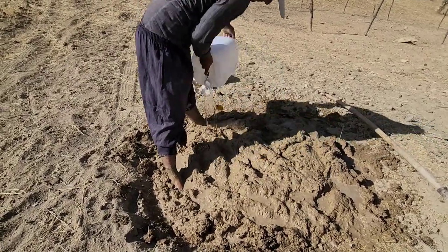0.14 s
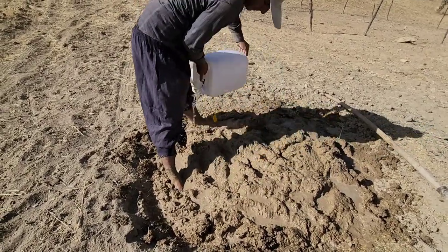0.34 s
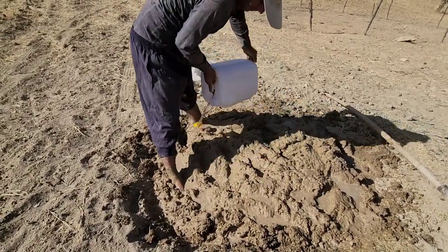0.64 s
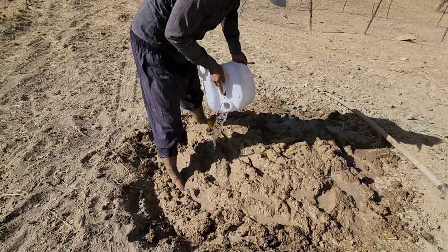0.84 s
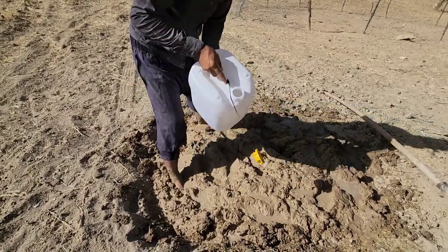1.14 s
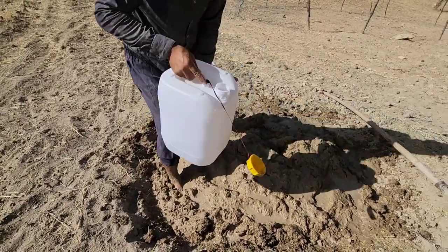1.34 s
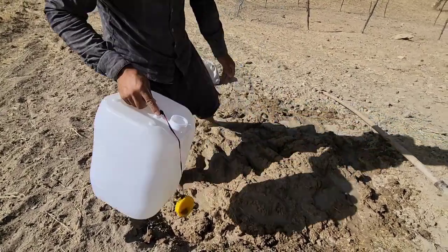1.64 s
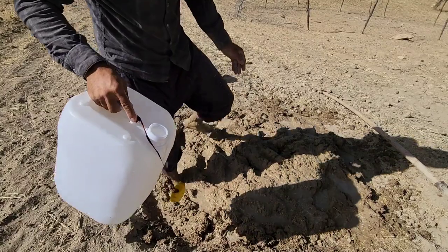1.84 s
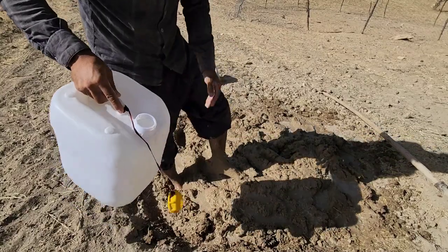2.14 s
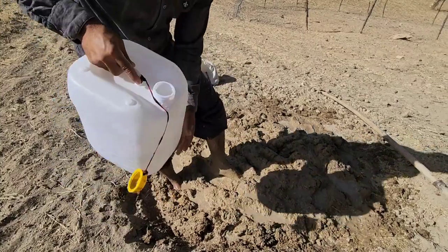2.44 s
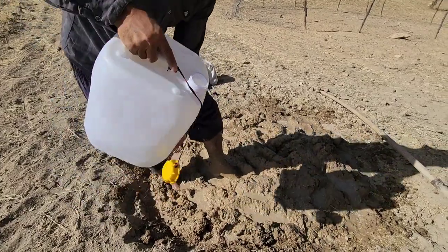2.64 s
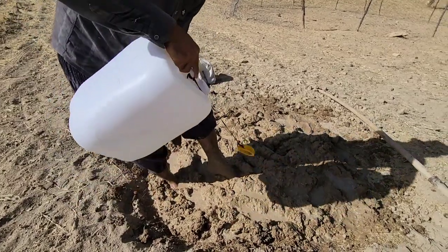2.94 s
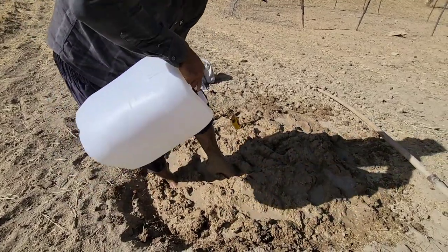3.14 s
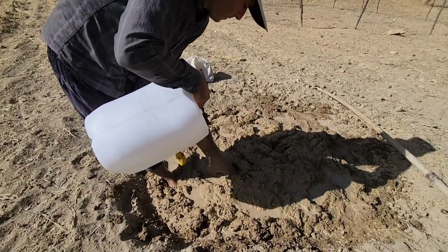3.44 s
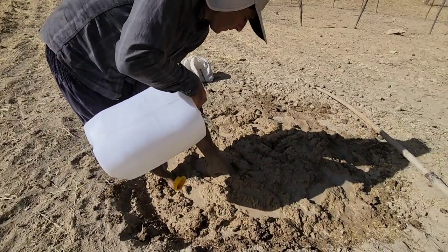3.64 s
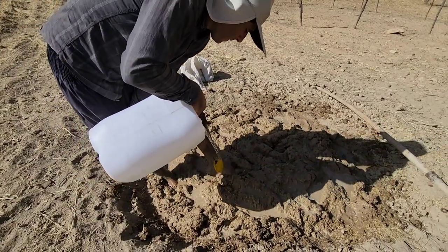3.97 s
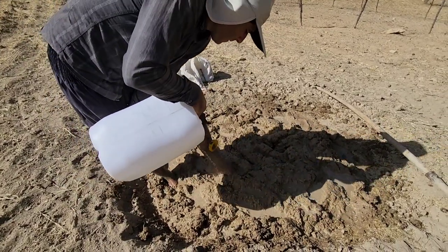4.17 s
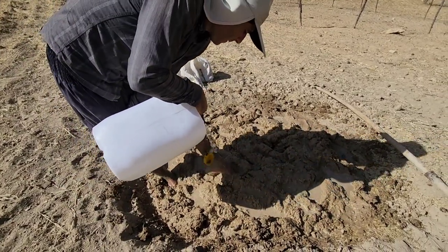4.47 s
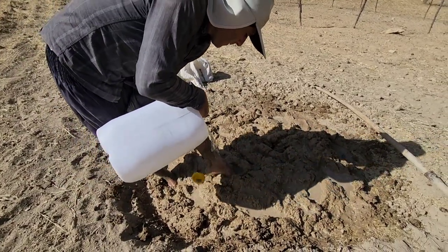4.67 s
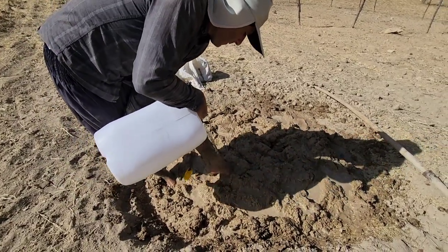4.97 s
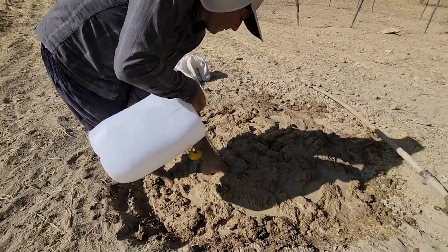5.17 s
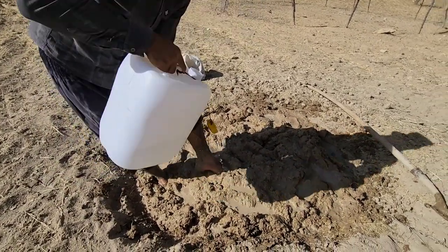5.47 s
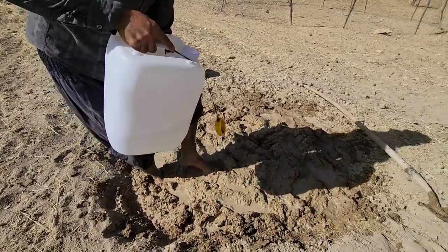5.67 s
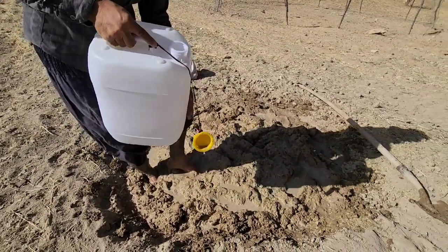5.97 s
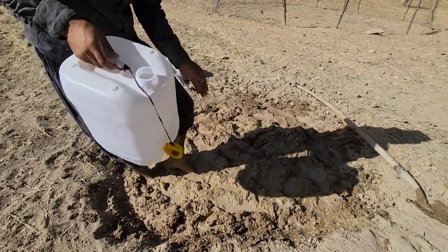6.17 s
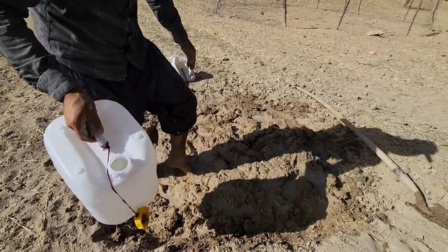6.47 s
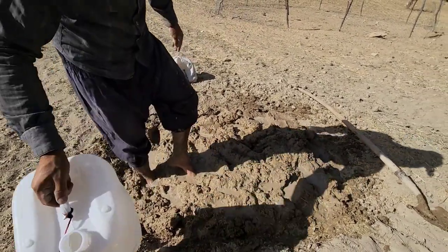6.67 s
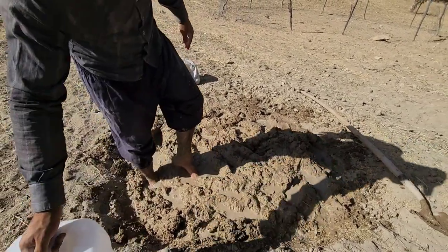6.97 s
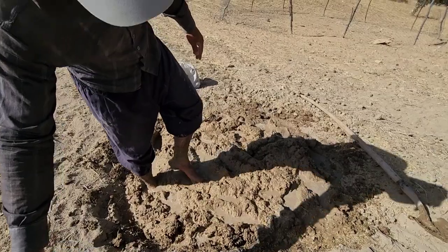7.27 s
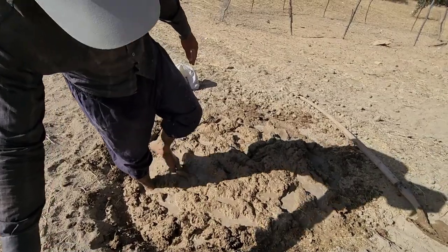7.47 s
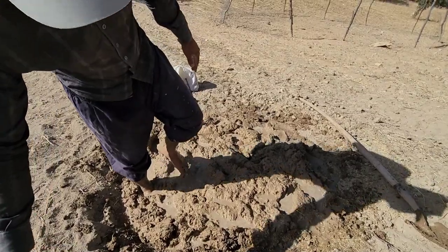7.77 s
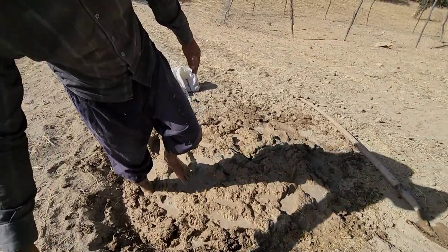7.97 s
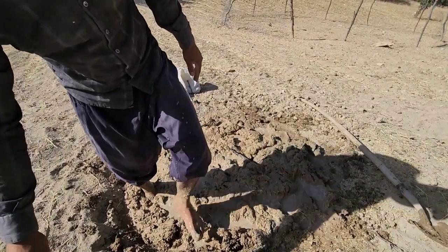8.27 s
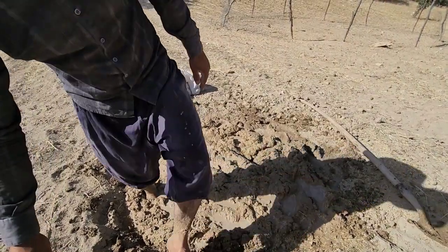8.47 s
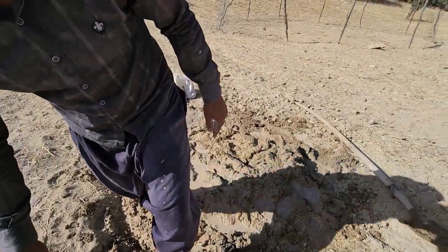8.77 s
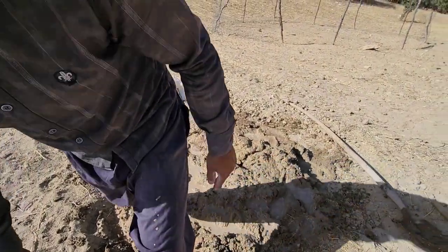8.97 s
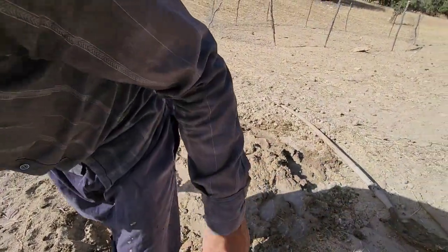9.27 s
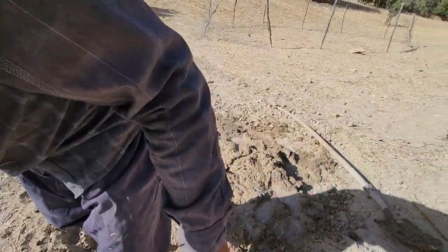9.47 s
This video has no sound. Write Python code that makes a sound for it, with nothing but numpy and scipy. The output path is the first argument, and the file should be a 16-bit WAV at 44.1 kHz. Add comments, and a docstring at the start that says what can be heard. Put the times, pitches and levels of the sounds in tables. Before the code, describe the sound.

Quiet open air, close stereo pickup, no room echo. From 0 to 1.1 s water spatters unevenly onto mud, bubbly and bright, with slapping drops and dull jug bumps. Small slosh spills and hollow thumps follow; a hard, booming plastic knock hits at 1.7 s, brief splashes at 2.0 to 2.3, and a double knock at 2.5. A soft rub and light bumps lead to a stronger lumpy splash at 3.8 to 4.4 s, then another pour from 4.5 to 5.6, gurgling and fizzing out. Knocks at 5.6, 6.1 and 6.3 s ring hollow, with a thin bright hiss fading and a very faint sinking whine around 6.4 to 7. At 7.1 to 7.25 s the jug thuds down with cloth rustle; short gritty scrapes at 7.6 and 7.85 include more knocks and a faint ringing drone. Soft thuds, wet ticks and rustles thin out until 9.5.

```python
"""Jug poured on mud

Outdoors on dry ground, water splashes from a big plastic jug onto a mud heap in three pours.
Bubble and droplet grains make the water; stray drops slap, and ringing modes make the jug thump as it is swung.
The jug is then knocked, set down and dragged (grains, singing walls) while bare feet tread the mud.
Grains make clothes rustle; a narrow hiss fades, a faint whine sinks, and coloured noise is the open air.
"""
import sys
import numpy as np
from scipy import signal
from scipy.fft import rfft, irfft, next_fast_len
from scipy.io import wavfile
from scipy.ndimage import uniform_filter1d, map_coordinates

SR = 44100
rng = np.random.default_rng(int(sys.argv[2]) if len(sys.argv) > 2 else 0)


def to_wav(s):
    """Save 16-bit WAV."""
    ch = np.atleast_2d(s).T  # columns
    pcm = np.round(np.clip(ch, -1, 1) * 32767)  # PCM
    wavfile.write(sys.argv[1], SR, pcm.astype(np.int16))


N = 424241
TIME_S = np.arange(N) / SR

# All dB columns are relative: sources trim them further.
# Open-air spectrum: freq_hz, density_db_per_hz
AIR_SPECTRUM = [(25, -10), (82, -5), (180, -17), (400, -18), (1100, -23.5), (1650, -22.5), (2700, -27),
                (4600, -25.5), (7100, -27), (16000, -45)]
# Left-right correlation of the air: freq_hz, correlation (no unit)
AIR_CORRELATION = [(60, 0.94), (240, 0.49), (950, -0.096), (3770, -0.2)]
# Water spectrum: freq_hz, density_db_per_hz
WATER_SPECTRUM = [(150, -55), (400, -25.5), (618, -31.5), (735, -23.5), (938, -12.5), (1550, -5),
                  (2620, -10.5), (3170, -6.5), (4050, -10), (7440, -8.5), (9010, -14), (15200, -19)]
# Left-right tilt of the water, scaled per side in scene(): freq_hz, tilt_db
WATER_TILT = [(550, 2), (1650, -0.5), (4970, -2.5), (15000, -1.5)]
# Three pours; pooling = splash in standing water over spatter on bare mud: time_s, flow_db, pooling_db
FIRST_POUR = [(0, -54.5, 2), (0.09, -54.5, -6), (0.24, -47.5, 2), (0.41, -59.5, -5), (0.5, -54, -11.5),
              (0.55, -48, -0.5), (0.62, -44, -4), (0.69, -54, 2.5), (0.81, -52, -10.5), (0.98, -53.5, -17),
              (1.03, -45.5, -6.5), (1.13, -59.5, -2)]
SECOND_POUR = [(3.75, -86, -18), (3.808, -42, -8), (3.946, -43, 0.5), (4.091, -41, -8.5),
               (4.146, -58.5, -2.5), (4.179, -40.5, -5), (4.234, -51, -1), (4.256, -46.5, 5),
               (4.37, -74.5, -10)]
THIRD_POUR = [(4.48, -68, -18), (4.55, -53.5, -29), (4.589, -41, -9), (4.71, -50.5, -9), (4.77, -49, 3.5),
              (4.84, -54, 0.5), (5.05, -48.5, 4), (5.23, -54, 3.5), (5.3, -47, -11.5), (5.418, -52.5, -2.5),
              (5.52, -50, -4.5), (5.57, -60, 4.5)]
# Short spills and sloshes as the jug swings: start_s, hold_s, flow_db, pooling_db
SPILLS = [(1.181, 0.06, -64, 8), (1.315, 0.1, -60.5, 2.5), (1.445, 0.19, -69.5, 1), (1.77, 0.45, -71.5, 0),
          (2.035, 0.072, -54, -2), (2.254, 0.014, -50, -15), (3.516, 0.034, -53, -4), (5.6, 0.37, -67, 5)]
# Water depth under the stream, as gurgle over splash: time_s, gurgle_db
DEPTH = [(0.25, -15.5), (0.6, -4), (1.4, -1), (2.1, -12), (3.9, -16.5), (4.55, -28), (5.0, -5.5), (5.9, -1)]
# Drops and wet mud snapping: start_s, level_db, pitch_hz, tick_db
DROPS = [(0.109, -27.5, 1615, -54), (0.215, -26.5, 1035, -73), (0.964, -39, 1650, -48.5),
         (1.096, -39, 1015, -42.5), (2.055, -30, 1360, -49), (2.101, -36, 3130, -49),
         (2.274, -30.5, 3730, -63.5), (2.988, -41.5, 3140, -61.5), (3.508, -42, 1670, -58.5),
         (3.521, -42, 5450, -45.5), (3.803, -32, 3050, -60.5), (3.905, -27, 1540, -32.5),
         (3.991, -23.5, 3300, -59), (4.059, -25.5, 3460, -56), (4.172, -27.5, 1610, -54),
         (4.251, -29.5, 2420, -45), (4.266, -28, 3870, -58), (4.284, -36.5, 1200, -70),
         (4.461, -51, 5150, -56.5), (4.505, -39.5, 3240, -53), (4.574, -30, 3220, -51),
         (4.767, -24.5, 1530, -63), (4.872, -32, 2750, -55), (5.053, -28.5, 1390, -66),
         (5.299, -36, 2640, -45.5), (5.464, -34, 2400, -54), (5.482, -25, 4050, -60),
         (5.501, -25.5, 2630, -55), (5.746, -37.5, 1890, -71), (5.839, -40.5, 1590, -60),
         (5.953, -43.5, 1250, -65), (6.633, -48, 1600, -70), (7.44, -37.5, 1090, -82),
         (8.103, -48, 4330, -69), (8.97, -43, 2110, -68.5), (9.044, -44.5, 1200, -77),
         (9.112, -51.5, 1650, -77.5), (9.484, -56.5, 3800, -69.5)]
# Wall and air modes of the jug: fuller_hz, lighter_hz, on_ground_hz, level_db, t60_s
JUG_MODES = [(74.4, 72, 84, -13.5, 0.65), (122.8, 133, 150, -7.5, 0.6), (242.3, 460, 190, -8, 0.22),
             (289.2, 312, 258, -3.5, 0.19), (378.6, 390, 418, 2, 0.12), (467, 492, 430, -4.5, 0.16),
             (594.5, 585, 578, -6, 0.092), (664, 684, 690, -5, 0.11), (784, 440, 770, -9.5, 0.13),
             (1062, 1400, 840, -1, 0.041), (1383, 1700, 1900, -9.5, 0.057), (1723, 3100, 1790, -9.5, 0.04),
             (3495, 5600, 3350, -14, 0.035)]
# Dense wall modes: freq_hz, level_db
WALL_SPECTRUM = [(110, -4.5), (200, -0.5), (330, 1.5), (1000, 0.5), (2000, 0), (2900, -17), (7000, -5),
                 (14000, -32)]
# Boom, hollow, body, rap and crack registers: low_hz, high_hz
REGISTERS = [(45, 95), (100, 180), (220, 700), (700, 3000), (3000, 16000)]
# Left-channel lead of the jug: time_s, lead_samples
JUG_LEAD = [(0, 1.2), (1.7, 7.1), (2.5, 7.5), (5.6, 8.9), (6.3, 8.6), (7.2, 13.7)]
# Soft bumps of water, legs and ground on the jug: start_s, boom_db, hollow_db, body_db, rap_db
THUDS = [(0.139, -51, -44.5, -86, -55), (0.338, -79, -56, -74, -58.5), (0.436, -46.5, -65, -93, -84),
         (1.214, -44, -65, -45, -71), (1.329, -51, -59, -72.5, -60), (1.39, -47, -52.5, -53.5, -66),
         (1.552, -61, -61, -58.5, -61), (2.95, -74, -66.5, -57, -76), (3.154, -78, -59.5, -48.5, -57.5),
         (3.419, -79, -79.5, -60, -58.5), (3.645, -77, -56, -54, -60.5), (6.177, -42.5, -40, -70, -64.5),
         (6.497, -71, -61, -55, -63), (6.631, -77, -69, -62, -57.5), (7.106, -44, -46.5, -44, -49.5),
         (7.618, -45, -43.5, -49, -43.5), (7.953, -70, -51, -46, -54), (8.008, -72, -49, -45.5, -49),
         (8.083, -74, -55, -48, -54), (8.205, -82, -67, -56, -62), (8.503, -81, -66.5, -62.5, -65),
         (8.969, -77.5, -73, -62, -59.5), (9.015, -77, -69, -58.5, -56), (9.18, -78, -75.5, -60.5, -73)]
# Big air bubbles: start_s, level_db, start_hz, end_hz, length_s
GLUGS = [(0.914, -45, 250, 550, 0.05), (1.198, -40, 516, 368, 0.015), (1.382, -47, 300, 282, 0.049),
         (1.436, -48, 690, 574, 0.019), (3.159, -48, 349, 372, 0.062), (4.773, -50, 1565, 1150, 0.026),
         (5.347, -40.5, 750, 1090, 0.012)]
# Hard blows on the jug: start_s, push_db, boom_db, hollow_db, body_db, rap_db, crack_db
KNOCKS = [(1.6848, -9.5, -26, -34.5, -24.5, -29, -42), (2.5253, -7, -40, -38, -29.5, -35, -52),
          (2.55, -28, -41.5, -41, -49, -45.5, -67), (5.625, -9.5, -46.5, -45, -37, -38, -49.5),
          (6.059, -37, -65, -55, -53.5, -52, -59.5), (6.307, -10.5, -43, -44.5, -30.5, -39.5, -51),
          (7.214, -14, -45.5, -38, -34.5, -35.5, -52.5), (7.233, -16, -43, -38.5, -31.5, -39, -52),
          (7.734, -32, -66, -48, -44.5, -46.5, -68.5), (7.832, -40, -55.5, -48.5, -49, -48, -72),
          (7.85, -16.5, -49.5, -48.5, -41, -46.5, -62)]
# Cloth and crumbling soil, one row per movement: start_s, hold_s, rub_db, swish_db
RUSTLES = [(1.818, 0.013, -67, -54.5), (2.353, 0.029, -79, -56), (2.748, 0.24, -56.5, -71),
           (7.078, 0.041, -43, -59.5), (7.239, 0.23, -52, -61.5), (7.586, 0.029, -47, -52.5),
           (7.894, 0.18, -68, -67), (8.628, 0.097, -61, -67.5), (8.939, 0.13, -61, -85),
           (9.09, 0.045, -69.5, -65.5)]
# Cloth spectrum: freq_hz, density_db_per_hz
CLOTH_SPECTRUM = [(600, 9), (869, -2), (1350, 4), (5950, -11), (6370, -1.5), (16000, -28)]
# Narrow, bright hisses: start_s, hold_s, level_db
NARROW_HISSES = [(5.623, 0.01, -43), (5.8, 0.17, -61.5)]
# Scrapes of the jug over grit: start_s, hold_s, level_db, attack_s, t60_s
SLIDES = [(7.573, 0.04, -40.5, 0.036, 0.12), (7.848, 0.34, -45.5, 0.005, 0.95)]
# Scrape spectrum: freq_hz, density_db_per_hz
DRAG_SPECTRUM = [(45, -34), (132, -3.5), (215, 0), (319, -9), (457, -1.5), (512, -24), (700, -6),
                 (880, -10), (1150, -14), (1900, -24.5), (6600, -54)]
# Singing of the dragged walls: pitch_hz, level_db
SLIDE_RINGS = [(1700, -60.5), (2950, -66.5), (3500, -71.5)]

CUTOFF_HZ = 16200
WANDER_PER_S = 90
AIR_DB, AIR_HISS_DB = -66, -71
WATER_LEAD_SAMPLES, SPLASH_SPREAD_SAMPLES = 2.1, 0.95  # left-channel lead: mean, deviation
SPILL_ATTACK_S, SPILL_T60_S = 0.011, 0.1
LUMP_DB, PUDDLE_LUMP_DB = 2.08, 1.7  # per unit of wander; standing water cushions the lumps
DRAIN_T60_S = 1  # mud fizzes on after a pour
LIGHTER_FROM_S, SET_DOWN_S = 4.5, 7.0
JUG_PAN_DB = 0.55  # left over right
CONTACT_WIDTH_S, CONTACT_DELAY_S = 0.00018, 0.00074
RUSTLE_ATTACK_S, RUSTLE_T60_S = 0.021, 0.3
HISS_HZ, HISS_HALF_WIDTH, HISS_T60_S = 7540, 0.028, 0.28  # half width: share of pitch
WHINE_START_S, WHINE_HOLD_S, WHINE_DB = 6.42, 0.57, -74
WHINE_HZ, WHINE_SAG_HZ_PER_S = 1750, 780
SLIDE_FADE_DB_PER_S = 20.5  # slows as it slides
RING_HALF_WIDTH, RING_HOLD_S, RING_T60_S = 0.045, 0.15, 1.4  # half width: share of pitch


def from_db(db):
    """Decibels to amplitude."""
    return 10 ** (np.asarray(db) / 20)


def rms_one(x):
    """Scale to unit rms."""
    return x / np.sqrt(np.mean(x ** 2) + 1e-20)


def at_hz(points, hz):
    """Read a spectrum on a log-frequency axis."""
    freq_hz, value = np.array(points).T
    return np.interp(np.log(np.maximum(hz, 1)), np.log(freq_hz), value)


def at_time(points):
    """Read a (time_s, value) contour at every sample."""
    return np.interp(TIME_S, *np.transpose(points))


def noise(*shape):
    """White Gaussian noise."""
    return rng.standard_normal(shape)


def band(x, low_hz, high_hz, order=2):
    """Butterworth band-pass."""
    sos = signal.butter(order, [low_hz, high_hz], "band", fs=SR, output="sos")
    return signal.sosfilt(sos, x)


def colour(x, spectrum, share=1):
    """Shape a signal by a smooth spectrum, its dB scaled by share."""
    size = next_fast_len(N)
    gain = from_db(share * at_hz(spectrum, np.fft.rfftfreq(size, 1 / SR)))
    return irfft(rfft(x, size) * gain, size)[..., :N]


def add(out, start_s, sound):
    """Mix a short sound in at start_s."""
    at = round(start_s * SR)
    out[at:at + len(sound)] += sound[:N - at]


def dying(t, t60):
    """Exponential decay, 60 dB per t60."""
    return from_db(-60 * t / t60)


def swell(start_s, hold_s, attack_s, t60_s):
    """Attack, hold and release of one movement, as a gain in time; then silence."""
    out = np.zeros(N)
    age_s = np.arange(int((hold_s + t60_s) * SR) + 1) / SR
    attack = np.minimum(age_s / max(attack_s, 1e-3), 1)
    add(out, start_s, attack * dying(np.maximum(age_s - hold_s, 0), t60_s))
    return out


def wander():
    """Random contour: straight lines between unit-deviation Gaussian values."""
    return np.interp(TIME_S * WANDER_PER_S, np.arange(N), noise(N))


def narrow_noise(hz, half_width):
    """Flickering noise in one soft-edged resonance, unit rms."""
    flicker = from_db(2 * wander())
    return rms_one(flicker * band(noise(N), hz / (1 + half_width), hz * (1 + half_width), order=1))


def grains(gain, spectrum, low_hz, high_hz, per_s, cycles, spread_db, hiss):
    """Tiny impacts and bubbles of random size, rising pitch and place over fine hiss; stereo."""
    count = int(per_s * N / SR)
    age = np.arange(int(cycles * SR / low_hz))
    when, pitch, size, place = rng.random((count, 4)).T
    at = (when * N).astype(int)
    heard = gain[at] > 0
    at = at[heard, None]
    hz = low_hz * (high_hz / low_hz) ** pitch[heard, None]
    size_db = spread_db * np.minimum(-np.log(1 - size[heard, None]), 4)
    height = from_db(at_hz(spectrum, hz) + size_db) * hz
    # sqrt(12) turns a uniform draw into unit deviation
    right_lag = WATER_LEAD_SAMPLES + SPLASH_SPREAD_SAMPLES * np.sqrt(12) * (place[heard, None] - .5)
    sides = []
    for lag in (0, right_lag):
        turns = np.maximum(age - lag, 0) * hz / SR
        tone = np.sin(2 * np.pi * turns * (1 + 0.091 * turns / cycles))
        rings = height * (1 - np.exp(-2 * turns)) * dying(turns, cycles) * tone
        sides.append(np.bincount((at + age).ravel(), rings.ravel(), N + len(age))[:N])
    grain = rms_one(np.array(sides)) * np.sqrt(np.mean(gain > 0))
    fine = rms_one(band(colour(noise(2, N), spectrum), low_hz, high_hz))
    return gain * (grain + hiss * fine) / np.hypot(1, hiss)


def outdoors(x, lead_samples, scatter_db, scatter_hz, scatter_t60_s):
    """Sound reaches the left channel first; rough ground scatters some treble to each side."""
    t = np.arange(SR // 12) / SR
    echoes = band(noise(2, len(t)) * dying(t, scatter_t60_s), scatter_hz, CUTOFF_HZ)
    echoes *= from_db(scatter_db) / np.sqrt(np.sum(echoes ** 2, axis=1, keepdims=True))
    right = map_coordinates(x, [np.arange(N) - lead_samples], order=3)
    return np.array([x, right]) + signal.fftconvolve(x[None], echoes, axes=1)[:, :N]


def air():
    """Still open air as partly correlated noise, with a faint band of hiss."""
    mid_db = [(hz, 10 * np.log10(1 + c)) for hz, c in AIR_CORRELATION]
    side_db = [(hz, 10 * np.log10(1 - c)) for hz, c in AIR_CORRELATION]
    mid, side = colour(noise(N), mid_db), colour(noise(N), side_db)
    open_air = rms_one(colour(np.array([mid + side, mid - side]), AIR_SPECTRUM))
    hiss = rms_one(band(noise(2, N), 4360, 4830, order=1))
    return from_db(AIR_DB) * open_air + from_db(AIR_HISS_DB) * hiss


def stream():
    """Gurgle, splash and spatter gains: flow drives all, standing water favours the first two."""
    spatter, splash = np.zeros((2, N))
    for rows in (FIRST_POUR, SECOND_POUR, THIRD_POUR):
        time_s, flow_db, pooling_db = np.transpose(rows)
        drain = swell(time_s[0], time_s[-1] - time_s[0], 0, DRAIN_T60_S)
        flow = from_db(np.interp(TIME_S, time_s, flow_db)) * drain
        spatter += flow
        splash += flow * from_db(np.interp(TIME_S, time_s, pooling_db))
    for start_s, hold_s, flow_db, pooling_db in SPILLS:
        flow = from_db(flow_db) * swell(start_s, hold_s, SPILL_ATTACK_S, SPILL_T60_S)
        spatter += flow
        splash += flow * from_db(pooling_db)
    lumps = wander()  # the stream breaks into lumps
    splash *= from_db(PUDDLE_LUMP_DB * lumps)
    gurgle = splash * from_db(at_time(DEPTH))
    return gurgle, splash, spatter * from_db(LUMP_DB * lumps)


def pour():
    """Big bubbles in the puddle, small ones in the splash, spatter and fat splats, mist off bare mud."""
    gurgle, splash, spatter = stream()
    bare = spatter / (np.hypot(spatter, splash) + 1e-12)
    water = WATER_SPECTRUM
    big = grains(gurgle, water, 308, 800, per_s=250, cycles=26, spread_db=1.5, hiss=0.15)
    small = grains(splash, water, 800, 2700, per_s=1500, cycles=26, spread_db=4.0, hiss=0.2)
    fine = grains(spatter, water, 2630, 8300, per_s=2200, cycles=28, spread_db=3.8, hiss=0.45)
    splats = grains(spatter, water, 1400, 7500, per_s=130, cycles=11, spread_db=2.5, hiss=0)
    mist = grains(spatter * bare, water, 8300, 15660, per_s=1600, cycles=24, spread_db=3.5, hiss=0.55)
    bubbles = from_db(-3.0) * big + from_db(0.55) * small
    return bubbles + from_db(0.5) * (fine + 0.36 * splats) + from_db(-5.0) * mist


def drops():
    """A drop slaps with a sharp tick and short wet burst; the air pocket under it rings upward."""
    out, t = np.zeros(N), np.arange(SR // 10) / SR
    opening = 1 - np.exp(-t / 0.00083)
    tick_shape = np.exp(-abs(t - .0015) / 0.00079) + 0.055 * opening * dying(t, 0.024)
    for start_s, level_db, hz, tick_db in DROPS:
        pocket = np.sin(2 * np.pi * hz * t * (1 + 0.76 * t)) * dying(t, 0.025 * (hz / 1500) ** -.7)
        wet = rms_one(band(noise(len(t)), hz / 2, hz * 2)) * dying(t, 0.018)
        slap = rms_one(band(noise(len(t)), 5400, 8600, order=1)) * tick_shape
        body = from_db(level_db) * opening * (0.91 * pocket + .5 * wet)
        add(out, start_s, body + from_db(tick_db + 14) * slap)
    return out


def blow(t, state, rise_s, ring, dense_db, dense_t60_s):
    """Jug modes (state 0 fuller, 1 lighter, 2 on ground) over dense wall rattle; lows swell later."""
    def envelope(hz, t60_s):
        return (1 - np.exp(-t / (rise_s + 0.26 / hz))) * dying(t, t60_s * ring)

    modes, rattle = np.zeros((2, len(t)))
    for *pitches_hz, level_db, t60_s in JUG_MODES:
        hz = pitches_hz[state]
        detuned_hz = hz * (1 + 0.017 * rng.normal())
        tone = np.sin(2 * np.pi * (detuned_hz * t + rng.random()))
        modes += from_db(level_db) * envelope(hz, t60_s) * tone
    for hz in np.geomspace(110, 14000, 13):
        part = rms_one(band(noise(len(t)), hz / 1.293, hz * 1.231))
        rattle += from_db(at_hz(WALL_SPECTRUM, hz)) * envelope(hz, dense_t60_s * (hz / 500) ** -.65) * part
    crack = rms_one(band(noise(len(t)), 1500, 14000, order=1)) * dying(t, 0.0025)
    crack *= from_db(3.5) * np.exp(-rise_s / 0.0016)  # stronger for quick contact
    return modes + from_db(dense_db) * (rattle + crack)


def strikes(table, trim_db, rise_s, ring, dense_db, dense_t60_s):
    """The jug rings; where the blow lands sets how strongly each register answers."""
    out, t = np.zeros(N), np.arange(SR * 3 // 4) / SR
    for start_s, *levels_db in table:
        state = int(start_s > LIGHTER_FROM_S) + int(start_s > SET_DOWN_S)
        sound = blow(t, state, rise_s, ring, dense_db, dense_t60_s)
        for (low_hz, high_hz), level_db in zip(REGISTERS, levels_db):
            part = band(sound, low_hz, high_hz, order=2 if high_hz < 200 else 3)
            loudest_rms = np.sqrt(uniform_filter1d(part ** 2, size=SR // 20).max())
            add(out, start_s, from_db(level_db + trim_db) * part / loudest_rms)
    return out


def thuds():
    """Soft, slow contacts ring the jug dully."""
    return strikes(THUDS, trim_db=-1.0, rise_s=0.0014, ring=0.66, dense_db=-11.0, dense_t60_s=0.28)


def glugs():
    """Big bubbles glide in pitch as they rise, some through the water in the jug, some in the puddle below."""
    out = np.zeros(N)
    for start_s, level_db, start_hz, end_hz, length_s in GLUGS:
        age = np.linspace(0, 1, int(length_s * SR))
        envelope = np.minimum(age / 0.036, 1) * (1 - age) ** 0.27
        hz = start_hz + (end_hz - start_hz) * age
        add(out, start_s, from_db(level_db) * envelope * np.sin(2 * np.pi * np.cumsum(hz) / SR))
    return out


def contacts():
    """Each hard blow starts with one brief two-sided pressure push."""
    out = np.zeros(N)
    push = np.arange(SR // 100) / SR / CONTACT_WIDTH_S - 3
    for start_s, push_db, *_ in KNOCKS:
        add(out, start_s + CONTACT_DELAY_S, from_db(push_db) * push * np.exp(-push ** 2))
    return out


def knocks():
    """Hard blows: a contact push, then quick, bright ringing of the jug."""
    registers = np.delete(KNOCKS, 1, axis=1)  # without push_db
    return contacts() + strikes(registers, trim_db=2.5, rise_s=0.00032, ring=0.88,
                                dense_db=-10.0, dense_t60_s=0.21)


def knock_noise():
    """Uneven mid-treble noise swells over 40 ms from each hard blow's onset, then dies away."""
    out = np.zeros(N)
    t = np.arange(-SR // 25, SR // 4) / SR  # 0 at the peak
    envelope = np.where(t < 0, .5 * dying(abs(t), 0.13), dying(abs(t), 0.23))
    for start_s, *_, crack_db in KNOCKS:
        steps_db = 4 * np.repeat(noise(len(t) // 64 + 1), 64)[:len(t)]
        uneven = rms_one(band(noise(len(t)) * from_db(steps_db), 1199, 5500, order=1))
        add(out, start_s, from_db(crack_db - 12.5) * envelope * uneven)
    return out


def rustle():
    """Clothes rub and crumbs of soil shift underfoot: low rub and high swish grains."""
    rub, swish = np.zeros((2, N))
    for start_s, hold_s, rub_db, swish_db in RUSTLES:
        movement = swell(start_s, hold_s, RUSTLE_ATTACK_S, RUSTLE_T60_S)
        rub += from_db(rub_db - 7.5) * movement
        swish += from_db(swish_db - 0.5) * movement
    return (grains(rub, CLOTH_SPECTRUM, 530, 3500, per_s=330, cycles=3.9, spread_db=0.5, hiss=1.0)
            + grains(swish, CLOTH_SPECTRUM, 2830, 15300, per_s=2100, cycles=5.4, spread_db=4.0, hiss=0.7))


def narrow_hiss():
    """Narrow, bright hiss near 7.5 kHz that fades."""
    gain = sum(from_db(level_db) * swell(start_s, hold_s, 0, HISS_T60_S)
               for start_s, hold_s, level_db in NARROW_HISSES)
    return gain * narrow_noise(HISS_HZ, HISS_HALF_WIDTH)


def whine():
    """A faint, airy whine sinks in pitch: a gliding sine times low-frequency noise."""
    hz = WHINE_HZ - WHINE_SAG_HZ_PER_S * np.clip(TIME_S - WHINE_START_S, 0, 1)
    flutter = rms_one(band(noise(N), 15, 160))
    tone = np.sqrt(2) * flutter * np.sin(2 * np.pi * np.cumsum(hz) / SR)
    return from_db(WHINE_DB) * swell(WHINE_START_S, WHINE_HOLD_S, attack_s=0.026, t60_s=1.0) * tone


def drag():
    """The base slips on grit and the hollow body drones; the last, long slide makes the walls sing."""
    slide = np.zeros(N)
    for start_s, hold_s, level_db, attack_s, t60_s in SLIDES:
        fading_db = level_db - SLIDE_FADE_DB_PER_S * np.maximum(TIME_S - start_s, 0)
        slide += from_db(fading_db) * swell(start_s, hold_s, attack_s, t60_s)
    scrape = grains(slide, DRAG_SPECTRUM, 112.3, 3260, per_s=1100, cycles=20, spread_db=2.0, hiss=0.79)[0]
    singing = sum(from_db(level_db) * narrow_noise(hz, RING_HALF_WIDTH) for hz, level_db in SLIDE_RINGS)
    return scrape + singing * swell(SLIDES[-1][0], RING_HOLD_S, 0, RING_T60_S)


def scene():
    """Water lands ahead; the jug is carried off to the left."""
    small_sounds = outdoors(drops() + knock_noise() + narrow_hiss(), WATER_LEAD_SAMPLES,
                            scatter_db=-2.5, scatter_hz=2660, scatter_t60_s=0.023)
    left, right = pour() + rustle() + small_sounds
    water = np.array([colour(left, WATER_TILT, 0.45), colour(right, WATER_TILT, -0.87)])
    jug = outdoors(thuds() + glugs() + knocks() + drag(), at_time(JUG_LEAD),
                   scatter_db=1.5, scatter_hz=2460, scatter_t60_s=0.058)
    jug *= from_db([[JUG_PAN_DB / 2], [-JUG_PAN_DB / 2]])
    return water + jug + whine() + air()


def record(dry):
    """Steep elliptic low-pass."""
    return signal.sosfilt(signal.ellip(10, .2, 70, CUTOFF_HZ, fs=SR, output="sos"), dry)


dry = scene()
out = record(dry)
to_wav(out)
```